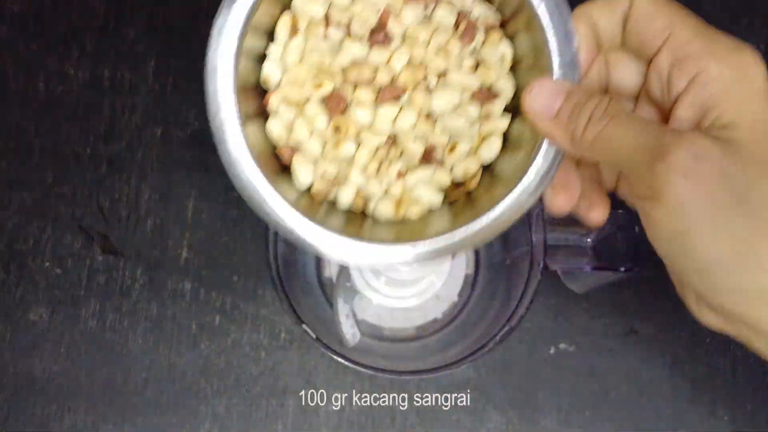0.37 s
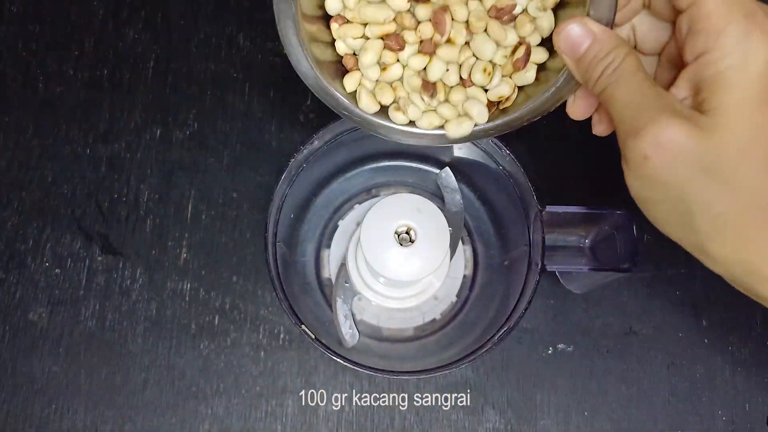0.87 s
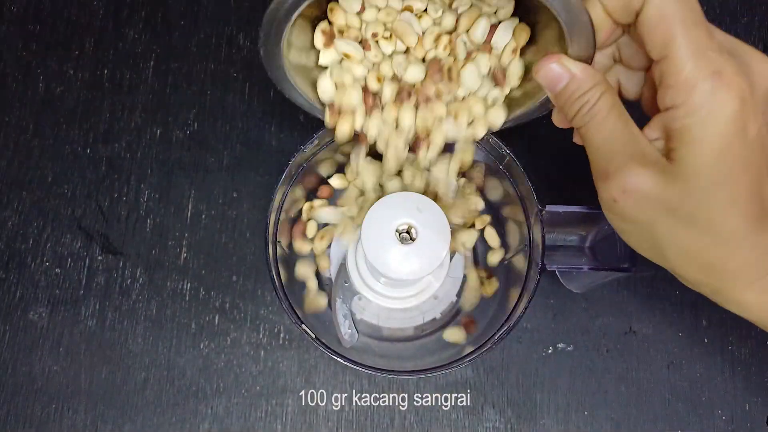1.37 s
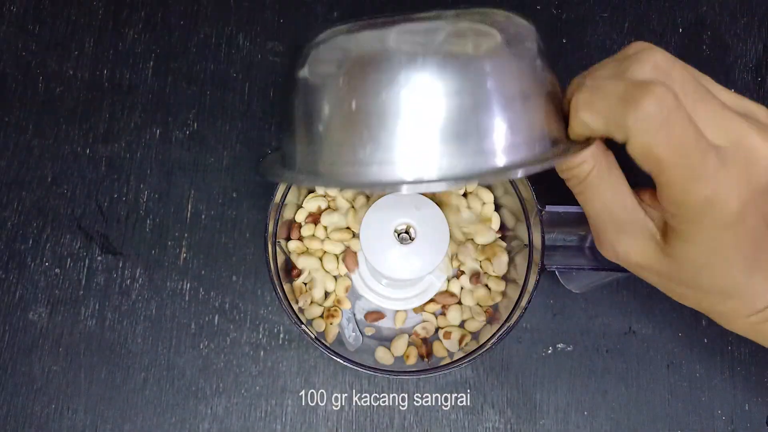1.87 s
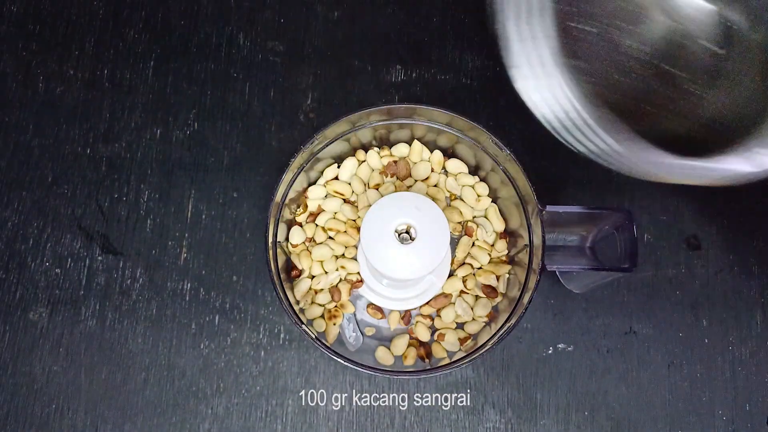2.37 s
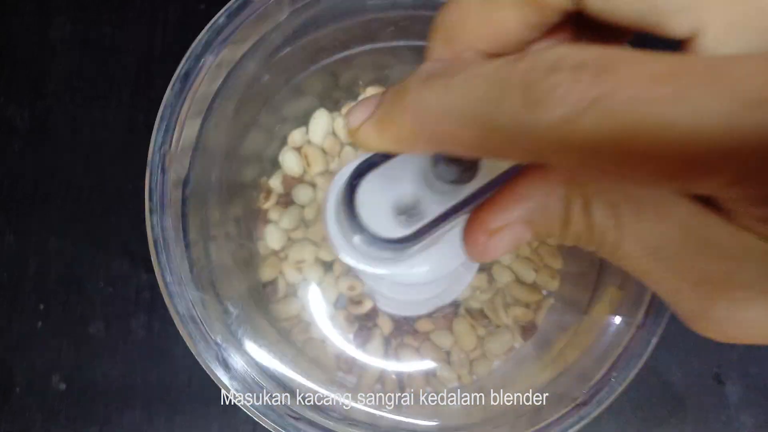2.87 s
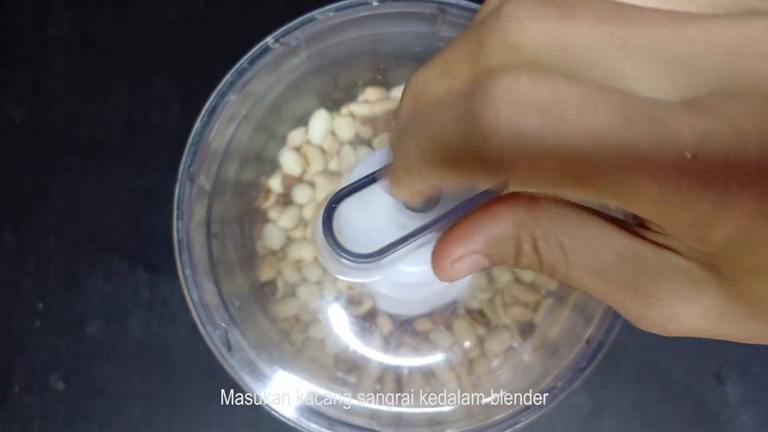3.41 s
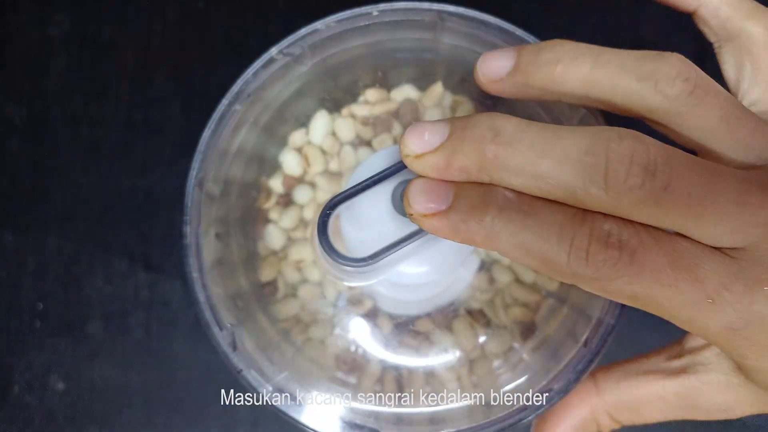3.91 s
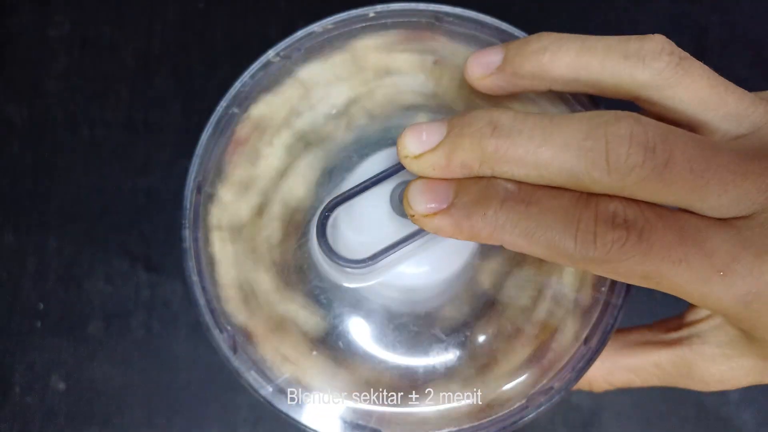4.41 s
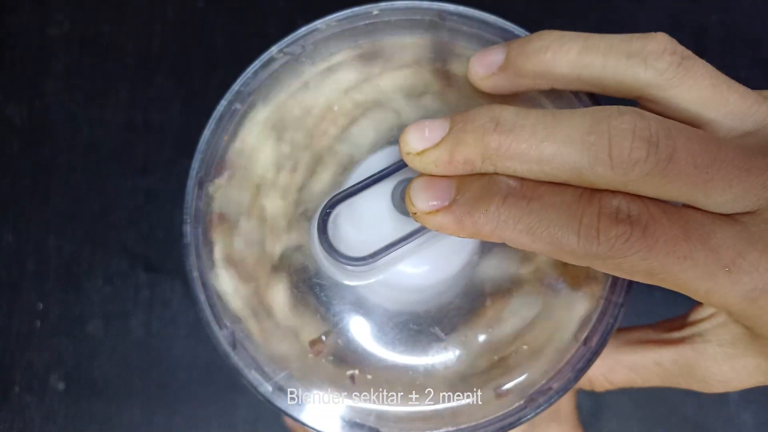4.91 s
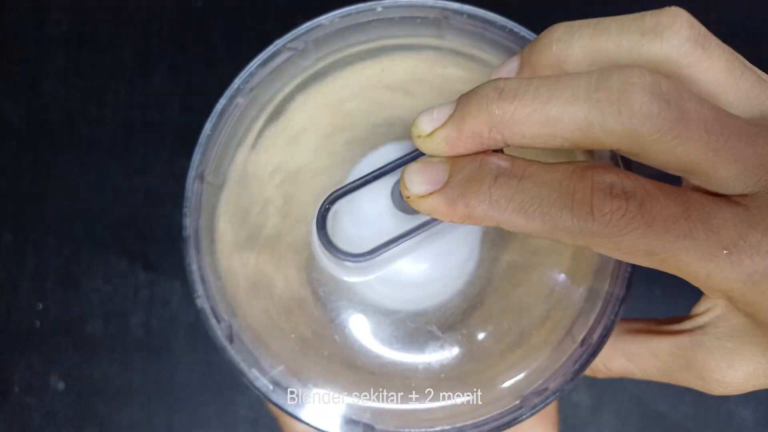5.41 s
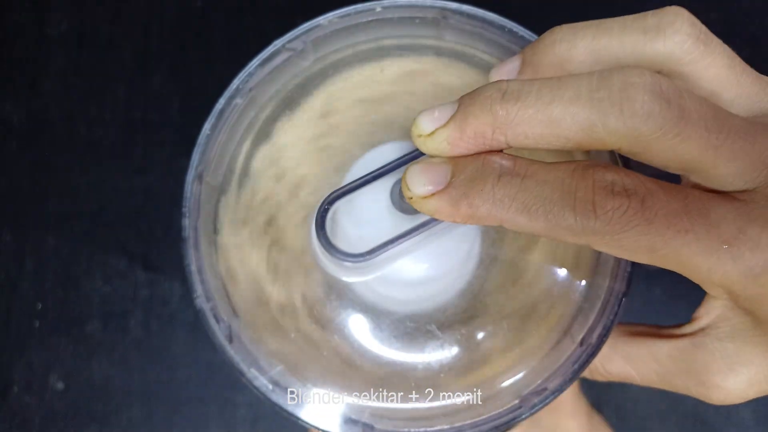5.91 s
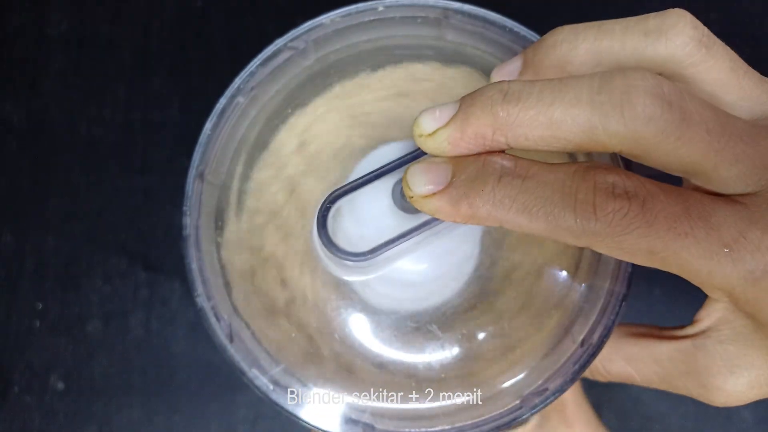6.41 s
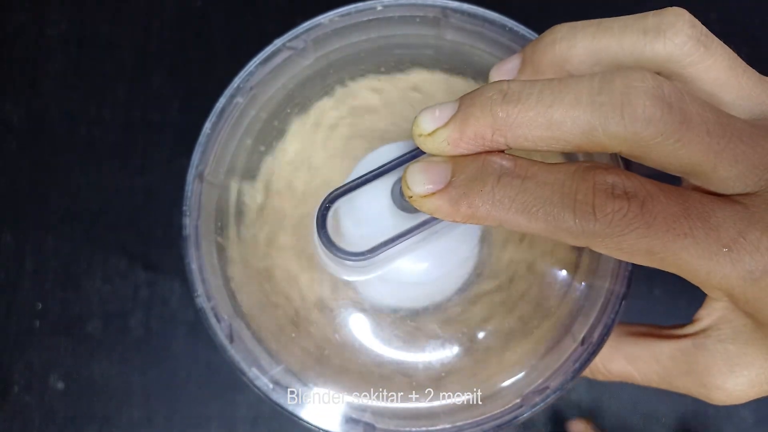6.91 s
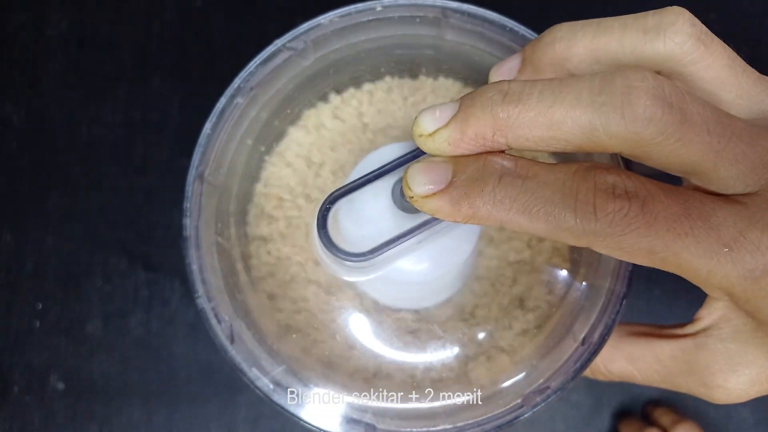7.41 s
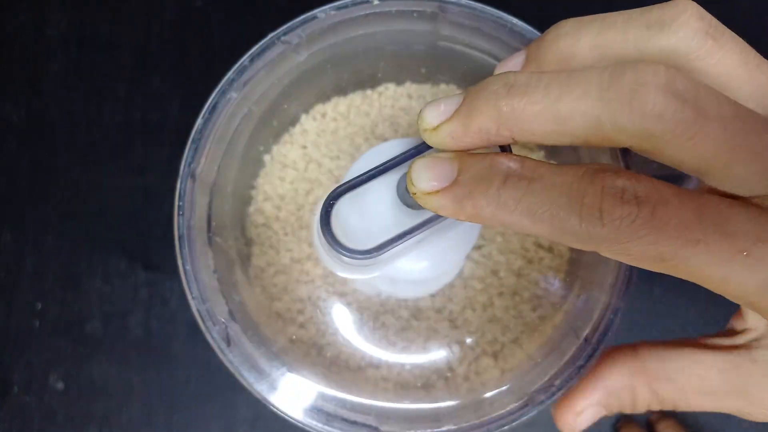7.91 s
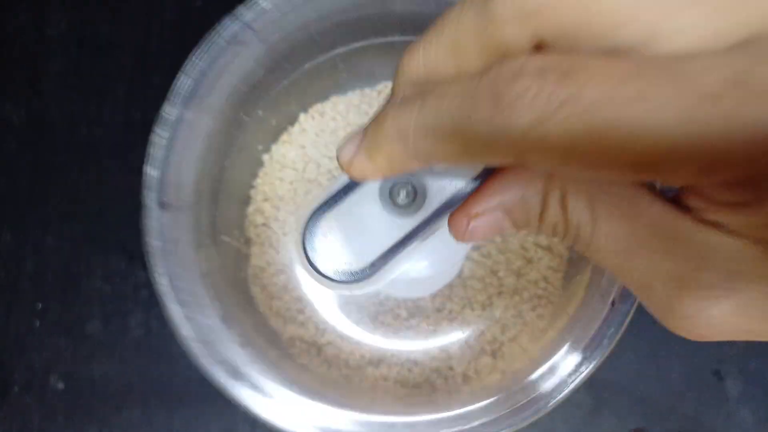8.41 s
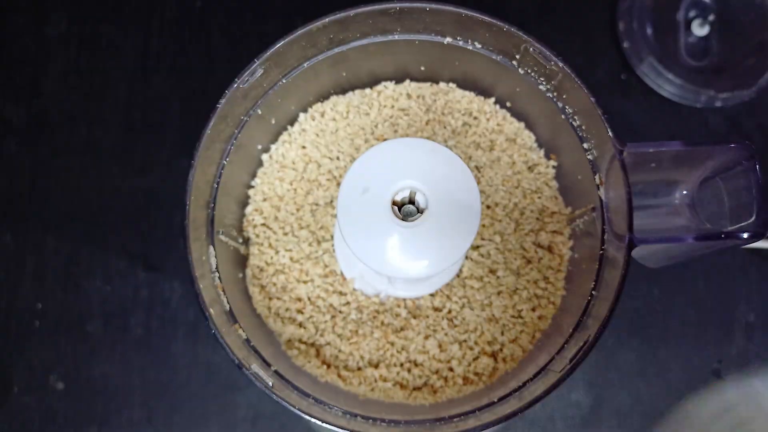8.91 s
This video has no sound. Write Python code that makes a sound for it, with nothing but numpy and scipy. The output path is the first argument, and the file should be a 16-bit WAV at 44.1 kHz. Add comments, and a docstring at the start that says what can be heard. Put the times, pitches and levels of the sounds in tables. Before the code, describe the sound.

Roasted nuts clatter from a steel bowl into a plastic cup, a lid clicks on, and a small chopper grinds harshly, then coasts down.

```python
"""Nuts in a small chopper

Roasted nuts slide from a steel bowl into a plastic cup: random blows ring resonances of bowl and cup.
The lid clicks on; blows on the closed cup grind coarse, then, after a jump in time, fine, over shaft
tone and mains buzz, and coast to a stop; the lid clicks off. Rough contacts make the clicks, swept sines
a bird's peeps, shaped noise the open kitchen's hiss and rumble. Two microphones a hand apart."""
import sys
import numpy as np
from scipy import signal
from scipy.io import wavfile
from scipy.ndimage import uniform_filter1d

SR = 44100
rng = np.random.default_rng(int(sys.argv[2]) if len(sys.argv) > 2 else 0)


def ratio_of_db(decibels):
    """Turn decibels (scalar or array-like) into linear amplitude factors; 0 dB maps to 1."""
    return 10 ** (np.asarray(decibels, float) / 20)


def store_pcm(level_fs):
    """Save levels as 16-bit WAV."""
    pcm = np.round(np.clip(level_fs, -1, 1) * 32767).astype(np.int16)
    wavfile.write(sys.argv[1], SR, np.atleast_2d(pcm).T)


N = 398663
T = np.arange(N) / SR
ON_S, CRUMBS_S, OFF_S = 4.13, 5.43, 5.95  # switch on, after a jump in time the nuts are crumbs, switch off
TOP_HZ = 252  # shaft turns a second that the spin-up tends to


# Blade among whole nuts: t/s, cup body relative level/dB, crack relative level/dB
WHOLE_STREAM = [(4.125, -26, -51), (4.165, -35.5, -33), (4.2, -26.5, -29), (4.25, -35.5, -33),
                (4.31, -30.5, -29.5), (4.366, -32, -28), (4.385, -34.5, -30.5), (4.62, -36.5, -33),
                (4.72, -36, -31), (4.86, -36.5, -33), (4.9, -36.5, -34), (5.18, -34.5, -33.5),
                (5.225, -36, -35), (5.3, -36, -33), (5.397, -35.5, -36.5)]
# Broad colour of whole nuts in the cup: f/Hz, relative level/dB per Hz
WHOLE_BED = [(35, -49), (60, -28), (91, -27), (130, -16), (469, -7), (651, -0.5), (803, -7), (5460, 0),
             (12700, -5.5), (16000, -6)]
# Resonances of the closed cup: f/Hz, width/Hz, relative level/dB
WHOLE_RINGS = [(347, 94, -7), (664, 90, -8), (995, 32, -4), (1500, 135, -3.5), (1853, 41, -3),
               (2380, 82, -8), (3580, 1900, -8), (5480, 660, 0.5), (7470, 520, 2), (9490, 190, -20),
               (11660, 4200, -2.5)]
# Blade among crumbs, slowing after switch-off: t/s, cup body relative level/dB, crack relative level/dB
CRUMB_STREAM = [(5.398, -36.5, -34), (6.0, -36, -34.5), (6.35, -37.5, -39.5), (6.9, -40, -48),
                (7.152, -43, -53.5), (7.45, -46.5, -61), (7.7, -54, -71), (7.8, -60, -85)]
# Broad colour of crumbs in the cup: f/Hz, relative level/dB per Hz
CRUMB_BED = [(35, -46), (60, -42), (96, -2.5), (130, -9.5), (198, -5.5), (469, -5), (666, -6), (1440, -5),
             (1780, -2.5), (4120, -1), (8320, -15.5), (10300, -16.5), (16000, -18.5)]
# Resonances of the cup lined with crumbs: f/Hz, width/Hz, relative level/dB
CRUMB_RINGS = [(318, 78, -6.5), (560, 85, -4.5), (658, 65, -1.5), (701, 58, -1), (915, 38, -1.5),
               (985, 110, -3.5), (1258, 93, -4), (1806, 110, -3.5), (1945, 60, 2.5), (2420, 290, -4.5),
               (2760, 650, -3), (3676, 250, -0.5), (4100, 140, -0.5), (5000, 210, -3), (5500, 250, -7),
               (10500, 1400, -16.5)]
# Hard fragments that crack on blade and wall: t/s, relative peak level/dB, favoured ring f/Hz
CHIPS = [(4.2044, -14, 4940), (4.2814, -15, 5430), (4.3334, -18, 5710), (4.3514, -14, 5540),
         (4.7434, -19, 1820), (4.9044, -15, 5230), (5.0194, -26, 5710), (5.0814, -19, 3690),
         (5.2804, -19, 5200), (5.5994, -26, 1770), (5.7794, -24, 1830), (5.9294, -24, 1760),
         (6.0317, -26, 2070), (6.1304, -27, 3120), (6.1814, -27, 2540), (6.7294, -31, 2950),
         (6.7954, -31, 2300), (6.9651, -37, 2200), (7.0984, -42, 2340), (7.1831, -45, 1560)]


def grind():
    """Pieces flung at the wall; crumbs come in clumps with each sweep of the slowing blade."""
    pieces = impacts(2200, spread_db=1.6, lag=11, skid_ms=3) * clumps(40, depth_db=1.5)
    pieces = struck(pieces, WHOLE_STREAM, WHOLE_BED, WHOLE_RINGS, bed_db=-3.0, vary_db=0.5)

    speed = shaft_hz() / TOP_HZ
    sweeps = ratio_of_db(0.6 * np.cos(2 * np.pi * np.cumsum(34 * speed) / SR))  # geared-down blade passes
    crumbs = impacts(700 + 2000 * speed, spread_db=1.0, lag=11, skid_ms=3)
    crumbs = crumbs * sweeps / np.sqrt(0.16 + speed)
    crumbs = struck(crumbs, CRUMB_STREAM, CRUMB_BED, CRUMB_RINGS, bed_db=-0.5, vary_db=4)
    low, upper = split(crumbs, 800)
    # coasting crumbs lose their upper body by 6 dB a second
    crumbs = low + upper * ratio_of_db(-6 * np.maximum(T - OFF_S - .8, 0))

    chips = singles(CHIPS, WHOLE_BED, WHOLE_RINGS, bed_db=-1.0, skid_s=0.00095, alike=0.54)
    coarse = stream(WHOLE_STREAM, pieces, split_hz=2400)
    return chips + coarse + stream(CRUMB_STREAM, crumbs, split_hz=1640)


# Low groan that falls with the slowing shaft: start t/s, length/s, relative top level/dB
GROAN = [(7.25, 0.24, -48)]
# Mains buzz: f/Hz, rms level/dB ahead of the swells
HUM = [(50, -66), (100, -53.5), (200, -58.5)]
# The buzz swells after switch-on and again around the jump in time: t/s, extra level/dB
BUZZ_SWELLS = [(4.14, 7), (5.37, 10)]
# Low jolts, one at the jump in time, one at switch-off: start t/s, length/s, top level/dB
JOLTS = [(5.385, .016, -44), (5.957, .016, -38)]


def motor():
    """Sines locked to the unbalanced shaft, mains buzz while switched on, and low jolts."""
    hz = shaft_hz()
    waver = 0.008 * evened(np.log(clumps(30, depth_db=1)))  # rms share of the shaft speed
    turn = 2 * np.pi * np.cumsum(hz * (1 + waver)) / SR

    level_db = -60.5 + 11.5 * np.clip((T - CRUMBS_S) / .05, 0, 1)  # louder on crumbs
    level_db = level_db - 0.4 * np.maximum(135 - hz, 0)  # the tone dies as the shaft slows below 135 Hz
    level_db = level_db + 2.5 / (1 + ((hz - 214) / 30) ** 2)  # the stand resonates as the shaft passes
    unbalance = ratio_of_db(level_db) * np.sin(turn)
    groan_phase = 5.3 * turn + 1.5 * np.log(clumps(30, depth_db=6))  # multiple of the shaft, roughened
    groan = swells(GROAN) * np.sin(groan_phase)
    shaft = clumps(35, depth_db=1.0) * np.sqrt(2) * (unbalance + groan)

    on = np.clip(np.minimum(T - ON_S, OFF_S - T) / 0.011, 0, 1)
    on = on * ratio_of_db(bumps(BUZZ_SWELLS, rise_s=0.15, fall_s=0.13))
    buzz = on * np.sqrt(2) * sum(ratio_of_db(db) * np.sin(2 * np.pi * f * T) for f, db in HUM)
    return shaft + buzz + swells(JOLTS)


def shaft_hz():
    """Turns a second: exponential spin-up after the switch, then a quick small loss and a long coast."""
    spin_up = 1 - np.exp(-np.maximum(T - ON_S, 0) / .17)
    off_s = np.maximum(T - OFF_S, 0)
    brake = 0.1  # share of the speed lost quickly
    coast = brake * np.exp(-off_s / .08) + (1 - brake) * np.exp(-off_s / 1.18)
    return TOP_HZ * spin_up * coast


# Pouring stream: t/s, thud on plastic relative level/dB, ring and crack relative level/dB
POUR_STREAM = [(1.03, -83, -68), (1.066, -60, -52), (1.085, -54, -41), (1.11, -48, -70), (1.135, -58, -35),
               (1.15, -46, -43), (1.172, -48, -35), (1.225, -52, -38), (1.35, -43.5, -36),
               (1.5, -50, -37.5), (1.88, -54, -46), (2.03, -75, -60), (2.1, -79, -94)]
# Broad colour of the pour: f/Hz, relative level/dB per Hz
POUR_BED = [(88, -50), (150, -27), (414, -30), (494, -15.5), (821, -16), (1390, -20), (2810, -2.5),
            (3160, -4), (6390, -7.5), (12700, -7), (16000, -13.5)]
# Resonances of steel bowl and empty cup: f/Hz, width/Hz, relative level/dB
POUR_RINGS = [(525, 32, -9.5), (641, 54, -8.5), (764, 110, -10.5), (860, 38, -6.5), (1698, 81, -7.5),
              (2000, 84, -13), (2450, 60, -0.5), (2640, 44, 2.5), (2880, 39, 2.5), (3750, 70, -0.5),
              (4170, 79, -2.5), (4640, 70, -6), (5400, 270, -5), (6120, 90, -1), (6530, 130, -1.5),
              (7200, 86, -1.5), (7440, 80, -4)]
# Nuts that land louder than the stream: t/s, relative peak level/dB, favoured ring f/Hz
NUTS = [(1.04, -29.5, 3870), (1.0588, -27.5, 2760), (1.067, -25, 3800), (1.0801, -23.5, 5520),
        (1.12, -24, 6850), (1.1331, -25, 4280), (1.1553, -15, 2880), (1.171, -19.5, 2950),
        (1.185, -22, 5500), (1.2219, -31, 5190), (1.2458, -28, 3750), (1.258, -23, 6960),
        (1.285, -22, 2450), (1.3316, -26, 5630), (1.3442, -23, 2620), (1.391, -24, 2800),
        (1.455, -29, 2630), (1.474, -26, 7500), (1.5422, -21.5, 4230), (1.593, -32, 6250),
        (1.612, -32, 6250), (1.6434, -23, 6350), (1.678, -37, 6300), (1.7442, -30, 11200),
        (1.7736, -39, 4140), (1.8051, -39, 2640), (1.8435, -36, 6250), (1.895, -40, 10500),
        (2.0045, -36, 3480), (2.2515, -41, 2960), (2.3094, -46, 3040)]
# The steel bowl rings freely as it empties: start t/s, length/s, relative top level/dB
BOWL_RING = [(1.47, 0.31, -47.5)]


def pour():
    """A stream of nuts on steel and plastic, with louder ones standing out."""
    falling = impacts(700, spread_db=2.6, lag=11, skid_ms=2.5) * clumps(90, depth_db=1.3)
    many = struck(falling, POUR_STREAM, POUR_BED, POUR_RINGS, bed_db=-4.0, vary_db=3.0, count=20)

    # from 1.4 s the heap of nuts buries these rings of the empty cup, by 25 dB a second
    buried_band = signal.butter(1, (2300, 2740), "band", fs=SR, output="sos")
    buried = signal.sosfiltfilt(buried_band, many)
    many = many - buried * (1 - ratio_of_db(-25 * np.maximum(T - 1.4, 0)))

    bowl_hz, bowl_width_hz = 6240, 110
    bowl = evened(signal.lfilter(*signal.iirpeak(bowl_hz, bowl_hz / bowl_width_hz, fs=SR), falling))
    loud_nuts = singles(NUTS, POUR_BED, POUR_RINGS, bed_db=-8.0, skid_s=0.0027, alike=.6)
    return swells(BOWL_RING) * bowl + stream(POUR_STREAM, many, split_hz=1630) + loud_nuts


# Handfuls of nuts, the lid and large tumbling pieces: t/s, relative peak level/dB, favoured ring f/Hz
THUDS = [(1.068, -38, 780), (1.171, -39, 684), (1.242, -32.5, 680), (1.324, -37, 810), (1.339, -33, 829),
         (1.39, -43, 824), (1.418, -34.5, 813), (1.516, -33, 710), (1.547, -33.5, 705), (1.653, -39, 860),
         (3.023, -29.5, 770), (4.204, -37, 708), (4.301, -26.5, 664), (4.633, -28, 624), (4.884, -30, 588),
         (5.419, -27.5, 685), (5.78, -28, 544), (6.021, -31, 950), (6.284, -25.5, 705), (6.548, -24.5, 673),
         (6.602, -23.5, 1020), (6.759, -32, 960), (6.891, -30, 686), (6.969, -29.5, 710), (6.999, -28, 616),
         (7.106, -28.5, 542), (7.185, -38, 690), (7.383, -41, 664), (7.648, -35.5, 681), (7.719, -41, 544)]
# Broad colour of the cup: f/Hz, relative level/dB per Hz
CUP_BED = [(150, -41), (400, -27.5), (800, -10.5), (1500, -22.5), (4000, -32), (16000, -70)]
# Low rings of the cup: f/Hz, width/Hz, relative level/dB
CUP_RINGS = [(371, 25, -6.5), (560, 50, -4), (645, 85, -1), (785, 52, -9.5), (865, 36, -12), (978, 46, -8)]


def thuds():
    """Soft contacts, mostly alike at both microphones, ring the low resonances of the cup."""
    return singles(THUDS, CUP_BED, CUP_RINGS, bed_db=1.0, skid_s=0.0023, alike=1.9)


# Knocks of lid, switch and fingers: t/s, ring relative level/dB, contact decay/ms, thump f/Hz,
# thump level over ring/dB, favoured ring f/Hz, treble snap level/dB
KNOCKS = [(2.893, -42.5, 1, 504, -20, 5000, 10), (3.003, -40, 1, 500, -20, 5900, 14),
          (3.025, -42.5, 8.5, 587, 4, 1200, -23), (3.172, -46.5, 6.2, 504, 2, 560, -20),
          (3.181, -40.5, 1, 480, -4, 7500, 17), (3.255, -13, 3, 335, -12, 2860, 5.5),
          (3.279, -27, 5.1, 324, 1, 1860, -10), (3.547, -39, 1, 1250, -5, 4200, 5),
          (3.579, -31, 8.3, 334, -14, 1550, -36), (3.589, -36, 5.1, 330, 0, 2200, -27),
          (3.608, -45, 1, 318, 1, 5800, 4), (3.622, -38.5, 9, 297, -1, 2200, -27),
          (3.635, -45, 7.4, 327, 5, 1300, -25), (3.719, -33, 8.9, 277, -1, 1500, -31),
          (3.726, -39, 3, 800, -8, 2200, -25), (3.766, -44, 3.9, 295, 8, 1020, -25),
          (3.7998, -32.5, 1.5, 505, -3, 2480, -27), (4.077, -46, 2.7, 3530, 4.5, 3500, -5),
          (4.126, -15, 2.1, 332, -14, 2700, -1), (4.169, -17, 3.8, 600, -17, 5160, 15),
          (7.6, -43, 4.9, 220, 12, 800, -25), (7.805, -38, 6, 317, 14, 800, -29),
          (7.809, -18.5, 5.8, 1040, -13, 2620, 26), (8.009, -51, 3, 1660, -3, 1740, -23),
          (8.079, -26, 2.1, 262, -0.5, 1470, -15), (8.085, -25.5, 5.2, 300, -2.5, 3000, 2),
          (8.309, -36, 3.8, 323, 1, 2740, -12), (8.332, -40, 4, 280, 0, 2770, -15)]
# Resonances of the damped lid: f/Hz, width/Hz, relative level/dB
LID_RINGS = [(335, 60, 7), (880, 110, 0), (990, 90, 1), (1300, 110, -3), (1550, 93, -11), (1760, 130, -7),
             (2200, 120, -4), (2620, 140, 6), (2870, 120, -3), (3100, 110, 2), (4060, 210, 4),
             (5000, 300, -5), (6030, 200, -4), (7200, 400, 4), (7800, 390, 4), (9640, 520, -5)]
# Broad colour of lid and cup: f/Hz, relative level/dB per Hz
LID_BED = [(88, -31), (150, 10.5), (941, 3), (1500, -5), (2870, 0), (4580, -13), (7770, -12), (8400, -12),
           (16000, -17)]
# The counter booms on after each thump: f/Hz, level under the thump/dB, t60/s
COUNTER = [(99.5, -25.5, 0.32), (216.8, -19, 0.16), (318, -19, 0.16), (392, -16, 0.068)]


def knocks():
    """A short rough contact rings the damped lid, thumps the hollow cup and sets the counter booming."""
    out, t, pushes = np.zeros((2, N + 4000)), T[:4000], np.zeros(N)
    roughs = rng.standard_normal((len(KNOCKS), 3, 1500))
    for (s, db, ms, thump_hz, thump_db, ring_hz, snap_db), rough in zip(KNOCKS, roughs):
        rings = LID_RINGS + [(ring_hz, ring_hz / 10, 14)]
        dull, snap = split(body(LID_BED, rings, bed_db=2), 2300)
        contact = (rough[:2] + 1.1 * rough[2]) * np.exp(-t[:1500] * 1000 / max(ms, .5))
        contact[:, 0] = 8  # the first sample of a contact is the hardest
        ring = signal.fftconvolve(contact, (dull + ratio_of_db(snap_db) * snap)[None], axes=1)[:, :4000]

        start = round(s * SR)
        pushes[start] = ratio_of_db(db + max(thump_db, -8))
        hollow = ratio_of_db(-60 * t / .02) * np.sin(2 * np.pi * thump_hz * t)
        thump = np.convolve(contact.mean(0), hollow)[:4000]
        knock = ring / abs(ring).max() + ratio_of_db(thump_db) * thump / abs(thump).max()
        out[:, start:][:, :4000] += ratio_of_db(db) * knock

    t = T[:SR // 2]
    boom = sum(ratio_of_db(db - 60 * t / t60) * np.sin(2 * np.pi * hz * t) for hz, db, t60 in COUNTER)
    boom = boom * np.minimum(t / 0.0059, 1)
    booms = signal.oaconvolve(pushes, boom)[:N]
    return (split(out[:, :N], 380)[1] + booms) * ratio_of_db([[1.1], [-1.1]])


# Nuts shifting in the carried steel bowl: start t/s, length/s, relative top level/dB
RUSTLE = [(0.44, 0.08, -70), (0.55, 0.23, -63), (0.82, 0.1, -69), (0.95, 0.1, -78)]


def rustle():
    """Tiny bright scrapes of nut on steel: dense blows through a treble band."""
    scrape = signal.butter(2, [7000, 16000], "band", fs=SR, output="sos")
    blows = impacts(4000, spread_db=0.0, lag=11, skid_ms=2.4)
    return swells(RUSTLE) * evened(signal.sosfilt(scrape, blows))


# Bird peeps: start t/s, length/s, f/Hz, rise/Hz, last drop/Hz, relative top level/dB
PEEPS = [(0.148, 0.018, 5000, 300, 0, -64), (0.179, 0.016, 5090, 20, 0, -63),
         (7.457, 0.056, 5200, 250, 700, -52)]


def bird():
    """Short whistles that rise a little and may drop at the end, with a faint octave."""
    out = np.zeros(N)
    for s, length, hz, rise_hz, drop_hz, db in PEEPS:
        u = np.clip((T - s) / length, 0, 1)
        turn = 2 * np.pi * np.cumsum(hz + rise_hz * u - drop_hz * u ** 9) / SR
        swell = np.sqrt(2 * np.sin(np.pi * u) + 1e-12)
        out += ratio_of_db(db) * swell * (np.sin(turn) + ratio_of_db(-21) * np.sin(2 * turn))
    return out * ratio_of_db([[1.5], [-1.5]])


# Reverberation of the kitchen: f/Hz, t60/s
KITCHEN = [(200, 0.39), (1000, 0.35), (4000, 0.53), (12000, 0.31)]


def kitchen(x):
    """Sparse reflections of random sign, each band dying at its own speed."""
    taps = np.zeros((2, SR // 2))
    # one reflection in every 20 samples
    at = np.arange(200, SR // 2 - 20, 20) + rng.integers(0, 20, (2, (SR // 2 - 201) // 20))
    np.put_along_axis(taps, at, rng.choice([-1., 1.], at.shape), 1)
    hz, t, z = signal.stft(taps, SR, nperseg=256)
    decay = ratio_of_db(-60 * t / read(KITCHEN, hz)[:, None])
    tail = signal.istft(z * decay, SR, nperseg=256)[1]
    return signal.fftconvolve(x, tail / np.linalg.norm(tail[0]), axes=1)[:, :N]


# Colour of the open kitchen's hiss: f/Hz, relative level/dB per Hz
AIR = [(15, -44), (25, -26), (102, 1), (149, -22), (394, -31), (516, -8.5), (796, 1), (1890, 2.5),
       (4030, -5), (14800, -29), (16000, -28)]
# Left-right likeness of the hiss: f/Hz, correlation
SAME = [(60, 0.87), (240, 1), (950, 0.052), (3770, -0.12), (15000, -0.16)]


def air():
    """Diffuse hiss with drifting patches, alike at both microphones only in the bass."""
    hz = np.fft.rfftfreq(1024, 1 / SR)
    a, b, c, d, patches = rng.standard_normal((N // 256 + 5, 513, 5)).T
    patches = evened(uniform_filter1d(uniform_filter1d(patches, 12, 0), 20, 1))
    same = np.clip(read(SAME, hz), -1, 1)[:, None]
    left = a + 1j * b
    right = same * left + np.sqrt(1 - same ** 2) * (c + 1j * d)
    z = np.array([left, right]) * ratio_of_db(read(AIR, hz)[:, None] + 0.9 * patches)
    hiss = signal.istft(z, nperseg=1024, noverlap=768)[1][:, :N]
    return ratio_of_db(-51.5) * evened(hiss) * ratio_of_db([[1.1], [-1.1]])


# The counter rumbles under pouring and hands: start t/s, length/s, relative top level/dB
RUMBLE = [(0.9, 1.1, -63), (1.7, 0.47, -66.5), (2.9, 1.53, -65), (7.2, 0.85, -56), (7.8, 0.87, -69)]


def rumble():
    """Low noise with a boom near 300 Hz: far traffic, hands, and the counter shaken by the shaft."""
    shake = ratio_of_db(-46) * (shaft_hz() / TOP_HZ) ** 2.3
    level = ratio_of_db(-72) + swells(RUMBLE) + shake
    deep = ratio_of_db(-79) * lumpy(28, 58)  # deep part of the traffic
    return level * (lumpy(106, 560) + ratio_of_db(-6.0) * lumpy(285.0, 313.0)) + deep


def wind():
    """Air moving over the microphones near the end: low pressure lumps that fade by 14 dB a second."""
    since_s = T - 8.862
    gust = np.clip(since_s / 0.0094, 0, 1) * ratio_of_db(-55.5 - 14 * np.maximum(since_s, 0))
    return gust * lumpy(26, 160)


def impacts(per_s, spread_db, lag, skid_ms):
    """Random blows with two small rebounds, each blow up to lag samples apart at the microphones."""
    u = rng.random((N, 6))
    at = np.flatnonzero(u[:, 0] < per_s / SR)
    size = ratio_of_db(spread_db * np.minimum(-np.log(1 - u[at, 1]), 3.2)) * np.sign(u[at, 2] - .5)
    late = np.round(lag * (u[at, 3] - .5)).astype(int)
    rebound = (u[at, 4:] * skid_ms * SR / 1000).astype(int).T
    at = np.r_[at, at + rebound[0], at + rebound[1]]
    late = np.tile(late, 3)
    size = np.r_[size, .7 * size, -.6 * size]
    return np.array([np.bincount(np.clip(at + side * late, 0, N - 1), size, N) for side in (1, -1)])


def body(bed, rings, bed_db):
    """Causal (minimum-phase) response of a broad bed with resonances standing on it."""
    hz = np.abs(np.fft.fftfreq(8192, 1 / SR))
    power = ratio_of_db(2 * (read(bed, hz) + bed_db))
    power = power + sum(ratio_of_db(2 * db) / (1 + (2 * (hz - f) / w) ** 2) ** 2 for f, w, db in rings)
    log_gain = np.log(power + 1e-10) / 2
    return np.fft.ifft(np.exp(log_gain - 1j * signal.hilbert(log_gain).imag)).real[:4096]


def struck(blows, rows, bed, rings, bed_db, vary_db, count=16):
    """Blows land on one of a few spots, changing every few ms; each spot favours other resonances."""
    spot = np.repeat(rng.integers(0, count, N // 256 + 1), 256)[:N]
    out = np.zeros((2, N))
    on = slice(round(rows[0][0] * SR), round(rows[-1][0] * SR))  # while the table runs
    for k, chance in enumerate(rng.standard_normal((count, len(rings), 2))):
        here = [(f * (1 + 0.012 * a), w, db + vary_db * b) for (f, w, db), (a, b) in zip(rings, chance)]
        response = body(bed, here, bed_db)
        response = response[None] / np.linalg.norm(response)
        here_blows = blows[:, on] * (spot[on] == k)
        out[:, on] += signal.oaconvolve(here_blows, response, axes=1)[:, :on.stop - on.start]
    return out


def stream(rows, x, split_hz):
    """The low thud and the high crack of a stream of blows follow their own strength."""
    low_db, high_db, gate = curves(rows)
    low, high = split(x, split_hz)
    low = low / low[:, gate > 0].std()
    high = high / high[:, gate > 0].std()
    return gate * (ratio_of_db(low_db) * low + ratio_of_db(high_db) * high)


def singles(rows, bed, rings, bed_db, skid_s, alike):
    """Separate louder blows: a decaying scrap of noise rings the body, each favouring its own note."""
    loud = np.zeros((2, N))
    for (s, db, hz), skid in zip(rows, rng.standard_normal((len(rows), 3, 300))):
        response = body(bed, rings + [(hz, hz / 9, 3.5)], bed_db)
        contact = (skid[:2] + alike * skid[2]) * np.exp(-T[:300] / skid_s)
        click = signal.fftconvolve(contact, response[None, :2048], axes=1)
        loud[:, round(s * SR):][:, :click.shape[1]] += ratio_of_db(db) * click / abs(click).max()
    return loud


def lumpy(low_hz, top_hz):
    """Low noise, mostly alike at both microphones."""
    noise = rng.standard_normal(N) + 0.54 * rng.standard_normal((2, N))
    band = signal.butter(2, [low_hz, top_hz], "band", fs=SR, output="sos")
    return evened(signal.sosfilt(band, noise))


def clumps(per_s, depth_db):
    """Chance wandering of a gain, with per_s random knots a second."""
    knots = rng.standard_normal(round(N / SR * per_s) + 2)
    return ratio_of_db(depth_db * np.interp(T * per_s, np.arange(len(knots)), knots))


def swells(rows):
    """Sum of smooth rises and falls."""
    return sum(ratio_of_db(db) * np.sin(np.pi * np.clip((T - s) / length, 0, 1)) ** 2 for s, length, db in rows)


def bumps(rows, rise_s, fall_s):
    """Extra dB that rise from each time and die away."""
    out = 0
    for s, db in rows:
        fall = np.exp(-np.maximum(T - s - rise_s, 0) / fall_s)
        out = out + db * np.clip((T - s) / rise_s, 0, 1) * fall
    return out


def curves(rows, fade_s=0.00049):
    """Columns over the whole time, and a gate that is open while the table runs."""
    s, *columns = np.transpose(rows)
    gate = np.clip(np.minimum(T - s[0], s[-1] - T) / fade_s, 0, 1)
    return [np.interp(T, s, c) for c in columns] + [gate]


def split(x, hz):
    """Low and high part, the high one inverted so that the two join without a gap."""
    low, high = (signal.butter(2, hz, kind, fs=SR, output="sos") for kind in ("low", "high"))
    return signal.sosfilt(low, x), -signal.sosfilt(high, x)


def evened(x):
    """Scales to an rms of one."""
    return x / np.sqrt(np.mean(x ** 2) + 1e-20)


def read(points, hz):
    """Reads a curve of (f/Hz, value) along a logarithmic frequency axis."""
    f, value = np.transpose(points)
    return np.interp(np.log(hz + 1), np.log(f + 1), value)


def scene():
    """Counter sounds with their echo, over the kitchen air."""
    near = split(pour() + grind() + rustle() + thuds(), 39)[1] * ratio_of_db([[.3], [-.3]])
    taps = knocks()
    echo = kitchen(ratio_of_db(-3) * near + ratio_of_db(-11) * taps)
    background = split(air(), 37)[1] + bird() + rumble() + wind()
    return ratio_of_db(2.0) * near + taps + echo + motor() + background


def roll_off(x):
    """The treble ends steeply here."""
    return signal.sosfilt(signal.butter(12, 16850, fs=SR, output="sos"), x)


def record(dry):
    """Limits the band to about 16 kHz with a linear-phase low-pass."""
    low_pass = signal.firwin(255, 16050, fs=SR)
    mix = signal.oaconvolve(dry, low_pass[None], "same")
    return roll_off(mix)


dry = scene()
out = record(dry)
store_pcm(out)
```